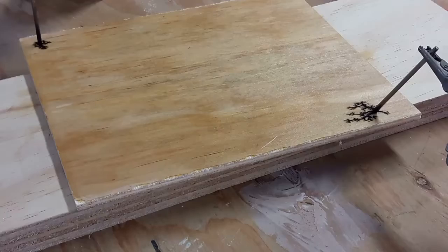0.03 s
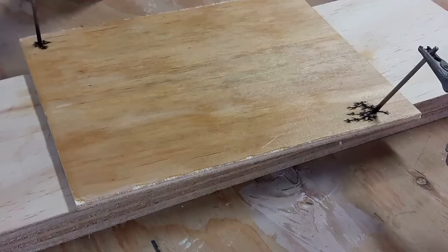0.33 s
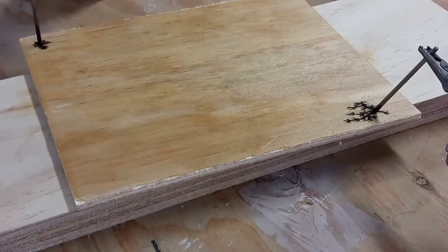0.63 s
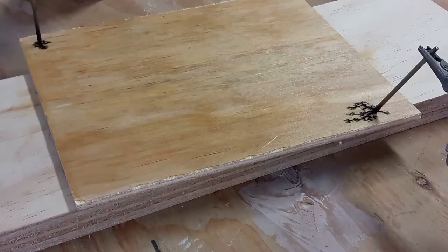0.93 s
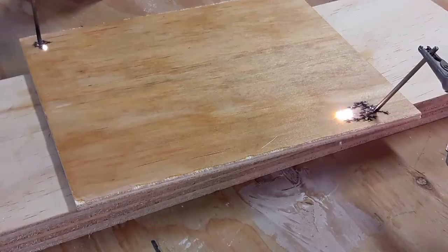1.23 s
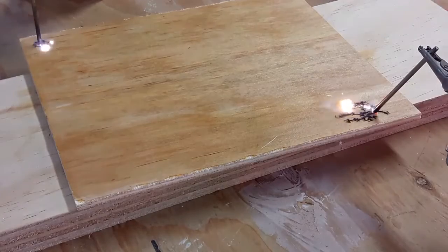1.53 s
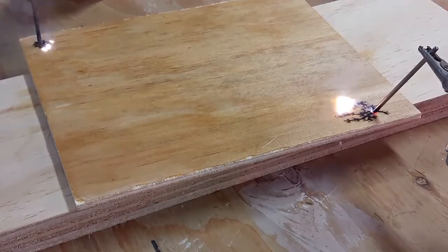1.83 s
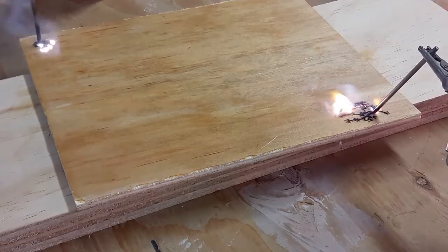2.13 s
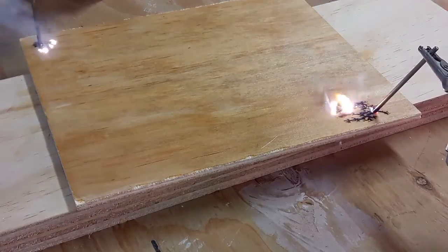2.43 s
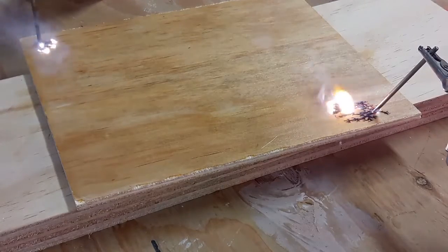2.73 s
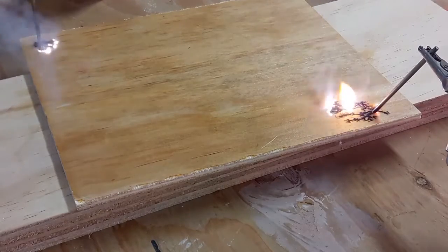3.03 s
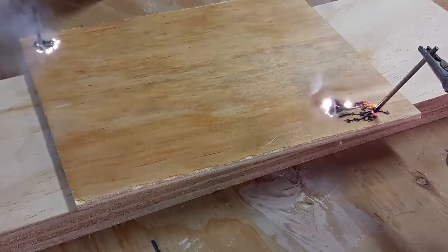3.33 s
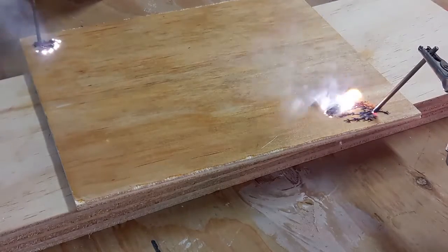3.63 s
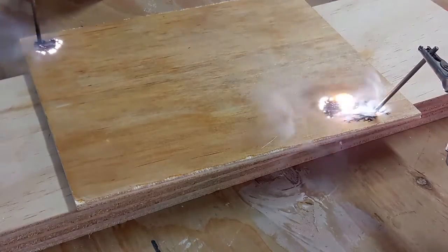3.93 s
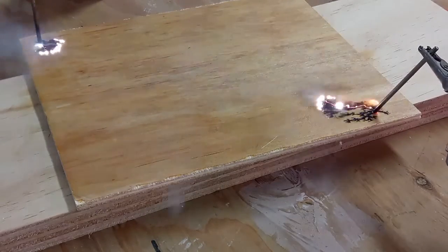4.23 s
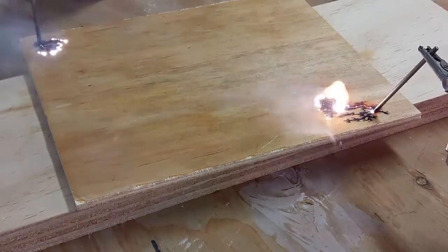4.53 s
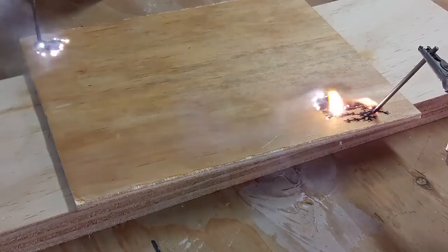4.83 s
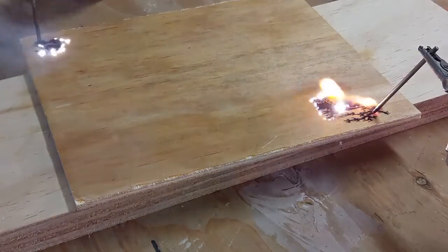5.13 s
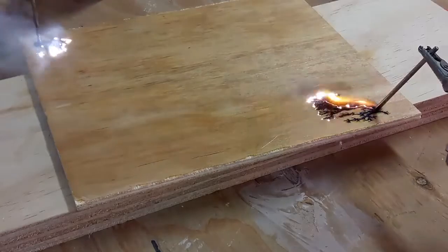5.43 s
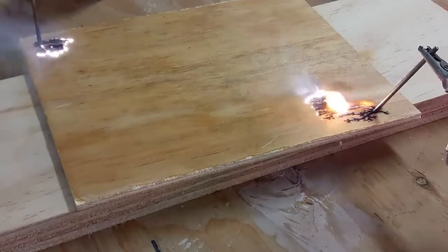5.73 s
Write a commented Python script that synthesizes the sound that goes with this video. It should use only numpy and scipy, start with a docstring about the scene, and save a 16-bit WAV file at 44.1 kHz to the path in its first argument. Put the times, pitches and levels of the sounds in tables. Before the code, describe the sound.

A fan whirs softly at a workshop bench, slightly left of the microphone. After about a second, a switch closes with a sharp, ringing metallic clack and a transformer begins a steady low hum. Electric arcs burn into damp plywood, first spitting quick runs of sparks with small dull pops and a faint flame flutter. Two short spurts of steam follow, and the hum eases under continuing sizzle and scattered snaps.

```python
"""High voltage burning tracks into damp plywood.

At a workshop bench, a fan whirs steadily left of the microphone. A transformer is switched on with a
ringing clack, then hums at twice and four times the mains rate, easing as the load settles. Arcs sizzle
on every voltage peak as they burn branching tracks into the board. A small flame flutters and pops,
sparks spit in runs and steam spurts from the wood."""
import sys
import numpy as np
from scipy import signal
from scipy.fft import rfft, irfft
from scipy.io import wavfile

SR = 44100
rng = np.random.default_rng(int(sys.argv[2]) if len(sys.argv) > 2 else 0)


def master(y):
    """Save y as 16-bit WAV."""
    cut = np.clip(np.atleast_2d(y).T, -1, 1)
    pcm = np.round(cut * 32767)  # scale
    wavfile.write(sys.argv[1], SR, pcm.astype(np.int16))


N = 258867
TIME = np.arange(N) / SR
BINS_HZ = np.arange(N // 2 + 1) * SR / N
MAINS_HZ, SWITCH_S = 59.972, 1.1245


def from_db(db):
    """Decibels to gain."""
    return 10 ** (np.asarray(db) / 20)


def unit_rms(x):
    """Scale to unit power."""
    return x / np.sqrt(np.mean(x ** 2) + 1e-20)


def over_time(points):
    """A curve over time, read at every sample."""
    return np.interp(TIME, *np.transpose(points))


def over_pitch(points):
    """A curve over log frequency, read at every bin."""
    hz, value = np.transpose(points)
    return np.interp(np.log(BINS_HZ + 1), np.log(hz), value)


def pan(left_db):
    """Channel gains that put the left side left_db above the right."""
    return from_db(np.array([[.5], [-.5]]) * left_db)


def pan_by_pitch(x, sides):
    """Pan each frequency by its own amount."""
    return irfft(rfft(x) * pan(over_pitch(sides)), N)


def from_left(x, lag_s):
    """Sound from the left reaches the microphone's right channel a little later."""
    return irfft(rfft(x) * np.exp(-2j * np.pi * BINS_HZ * lag_s * np.array([[0], [1]])), N)


def colour(x, spectrum):
    """Shape a signal's spectrum, then scale to unit power."""
    return unit_rms(irfft(rfft(x) * from_db(over_pitch(spectrum)), N))


def filtered(x, hz, kind):
    """A gentle Butterworth filter."""
    return signal.sosfilt(signal.butter(2, hz, kind, fs=SR, output="sos"), x)


def resonate(x, hz, width_hz):
    """One resonance, with gain 1 at its top."""
    r = np.exp(-np.pi * width_hz / SR)
    feedback = [1, -2 * r * np.cos(2 * np.pi * hz / SR), r * r]
    return signal.lfilter(np.array([1, 0, -1]) * (1 - r * r) / 2, feedback, x)


def drift(rate_hz):
    """Smooth random wander of unit power."""
    return unit_rms(irfft(rfft(rng.standard_normal(N)) / (1 + (BINS_HZ / rate_hz) ** 2), N))


def grains(per_s, spread_db):
    """Random clicks, most of them small, a few large."""
    sizes = from_db(spread_db * np.minimum(rng.exponential(1, N), 5)) * rng.choice([-1, 1], N)
    return sizes * (rng.random(N) < per_s / SR)


def bump(centre_s, half_s):
    """Envelope that swells and fades smoothly."""
    return np.exp(-.5 * np.minimum(((TIME - centre_s) / half_s) ** 2, 100))


def decay(start_s, t60_s, rise_s):
    """Envelope that swells quickly and dies away."""
    age = np.maximum(TIME - start_s, 0)
    return (1 - np.exp(-age / rise_s)) * from_db(-60 * np.minimum(age / t60_s, 4))


def powered(rise_s):
    """Rises from 0 to 1 once the switch is closed."""
    return 1 - np.exp(-np.maximum(TIME - SWITCH_S, 0) / rise_s)


def settled(centre_s=2.72, spread_s=.79):
    """Goes from 0 to 1 as the first flare-up dies down and the load settles."""
    return .5 + .5 * np.tanh((TIME - centre_s) / spread_s)


# How alike the room sounds on the two sides of the microphone: frequency_hz, correlation
ROOM_LIKENESS = [(40, 0.4), (130, 1), (280, 0.38), (610, 0.72), (1310, 0.13), (2800, 0.34), (7000, 0.028)]

def diffuse():
    """White noise from all around: alike in both channels in the bass, unrelated in the treble."""
    mid, side = rfft(rng.standard_normal((2, N)))
    alike = np.clip(over_pitch(ROOM_LIKENESS), -1, 1)
    return unit_rms(irfft(np.sqrt(1 + alike) * mid + np.sqrt(1 - alike) * side * [[1], [-1]], N))


def workshop(x, wet_db, t60_s=.067):
    """Direct sound plus the short, diffuse tail off nearby walls."""
    tail = (diffuse() * decay(.00042, t60_s, .0099))[:, :SR // 2]
    tail = tail / np.sqrt(np.sum(tail ** 2) / 2)
    return x + from_db(wet_db) * signal.fftconvolve(np.atleast_2d(x), tail, axes=1)[:, :N]


# The fan's rush of air: frequency_hz, gain_db
FAN_COLOUR = [(20, -17), (60, -11.5), (100, -13), (125, -3), (200, -4.5), (350, -3.5), (620, -4),
              (1000, -5), (1750, -7), (2500, -10.5), (4000, -18), (6000, -23.5), (7400, -20), (8400, -31.5),
              (10500, -41), (13000, -41)]
# Its hiss lies left of the microphone: frequency_hz, left_over_right_db
FAN_SIDES = [(60, 2.5), (2000, 2), (4000, 2), (7200, 8), (9000, 0)]
# Tones before the switch closes, from the fan's rotor and a faint mains hum at 120 and 360 Hz: pitch_hz,
# level_db
STEADY_PITCHES = [(119.5, -63), (188.4, -67), (250.5, -70), (313.5, -66), (360, -64.5), (438, -66),
                  (564.5, -62), (624.5, -65)]

def fan(air_db=-50, whine_db=-66, sag_db=-3):
    """Air rushes steadily; unsteady tones and a breathy whine soften once the transformer is running."""
    air = from_db(air_db) * pan_by_pitch(colour(diffuse(), FAN_COLOUR), FAN_SIDES)
    tones = sum(from_db(db) * np.sin(2 * np.pi * hz * TIME + .79 * drift(1.6)) for hz, db in STEADY_PITCHES)
    whine = from_db(whine_db) * unit_rms(resonate(diffuse(), hz=627, width_hz=22))
    sag = from_db(sag_db * powered(rise_s=1))
    return air + sag * (np.sqrt(2) * tones + whine) * pan(1.6)


# A thin hiss, far over to the left: frequency_hz, gain_db
HISS_COLOUR = [(1000, -12), (5000, -8), (7300, 1), (8400, -15), (12500, -27)]

def hiss(level_db=-62.5):
    """A faint hiss swells once before the switch closes."""
    swell = from_db(level_db) * bump(centre_s=.81, half_s=.06)
    return swell * colour(diffuse(), HISS_COLOUR) * pan(12)


# The switch's contacts striking, left of the microphone: start_s, relative_db
CONTACT_HITS = [(1.1233, -9), (1.1244, 1), (1.1280, -3), (1.1336, -7), (1.1440, -14)]
# Broad colour of the clack: frequency_hz, gain_db
CLACK_COLOUR = [(70, -37), (120, -41), (175, -5), (350, -19), (520, -5.5), (720, -9), (930, -27),
                (1250, -7.5), (1800, -5), (2400, -9.5), (3100, -6), (3250, -16.5), (7500, -14.5),
                (8200, -24.5), (12500, -41)]
# Resonances of the steel housing: pitch_hz, base_width_hz, relative_db
HOUSING_MODES = [(525, 39, -3), (710, 27, -1.5), (1200, 70, 2), (1410, 110, -4.5), (1840, 100, 2),
                 (2030, 65, -10), (2160, 26, -11), (2270, 20, -7), (2380, 27, -11), (2920, 110, -5),
                 (3100, 60, -7), (3540, 30, -2.5), (3790, 25, -9), (4630, 74, -9), (5250, 66, -6.5),
                 (5620, 24, -7), (5920, 29, -8), (6600, 26, -11), (6660, 15, -11), (6960, 43, -6.5),
                 (7630, 47, -11.5)]
# Its longest-ringing modes: pitch_hz, level_db, t60_s
LONG_MODES = [(296.5, -35, 0.3), (505, -40, 0.21), (711, -31.5, .15), (1250, -29.5, 0.16), (1385, -42, .2),
              (1476, -38, .2), (1502, -38, .2), (1735, -31, 0.28), (1890, -30, 0.18), (2930, -35, .2),
              (3110, -38, 0.39), (5259, -34, 0.14)]

def switch_clack(crack_db=-16, bite_db=-22.5, body_db=19, damping=1.03, thump_db=-32, thump_hz=179):
    """Switching on: a hard crack, the ringing housing and a low thump of inrush, with the room's echoes."""
    # the direct crack is thin; the low notes build up only with the echoes
    hits = sum(from_db(db) * decay(s, .013, .0002) for s, db in CONTACT_HITS)
    thin = filtered(colour(diffuse(), CLACK_COLOUR), [1700, 7000], "band")
    crack = from_db(crack_db) * hits * unit_rms(thin) * pan(6)
    hardest_s = CONTACT_HITS[1][0]
    bright = filtered(colour(diffuse(), CLACK_COLOUR), 4500, "high")
    bite = from_db(bite_db) * decay(hardest_s, .011, .0001) * unit_rms(bright) * pan(5)
    tail = from_db(-25) * decay(SWITCH_S, .28, .0065) * pan(1.9)
    echoes = from_db(1.5) * tail * colour(diffuse(), CLACK_COLOUR)
    # the blow and the rattle after it set the housing ringing
    blow = from_left(signal.unit_impulse(N, round(SWITCH_S * SR)), lag_s=.00037)
    force = from_db(3) * blow * pan(3.7) + tail * diffuse()
    body = sum((-1) ** k * from_db(db + body_db) * resonate(force, hz, width_hz * damping)
               for k, (hz, width_hz, db) in enumerate(HOUSING_MODES))
    ring = 0
    for hz, db, t60_s in LONG_MODES:
        phases = rng.uniform(0, 2 * np.pi, (2, 1))   # each channel hears a mode by its own paths
        ring += from_db(db) * decay(SWITCH_S, t60_s, .0013) * np.sin(2 * np.pi * hz * TIME + phases)
    inrush = from_db(thump_db) * decay(SWITCH_S, .21, .0079)
    thump = inrush * np.sin(2 * np.pi * thump_hz * (TIME - SWITCH_S))
    return bite + crack + echoes + body + ring * pan(1.2) + thump


# The hum's lowest tone, left of centre: time_s, level_db
LOW_HUM_LEVELS = [(1.3, -49), (1.6, -55.5), (1.85, -50.5), (2.08, -61), (2.33, -52), (2.7, -54),
                  (3.35, -48.5), (3.8, -52.5), (4.6, -54.5), (5.4, -51), (5.87, -51)]
# Its overtones, against the tone at four times the mains rate: mains_multiple, relative_db
HUM_OVERTONES = [(6, -29.5), (8, -23.5)]
# The hum falters where strong pops disturb the arc: centre_s, half_length_s, share_lost
HUM_FALTERS = [(2.308, 0.0037, 0.53), (4.187, 0.0048, 0.45)]

def transformer_hum(upper_db=-38.5, settle_db=-5, sway_db=1.14, waver=.14, shimmer_rad=.23):
    """The core flexes twice a mains cycle; the hum eases as the load settles and wavers with the arcs."""
    phase = 2 * np.pi * MAINS_HZ * TIME
    strength = from_db(over_time(LOW_HUM_LEVELS) + sway_db * drift(8)) * (1 + waver * drift(27))
    low = strength * powered(.092) * np.sin(2 * phase + waver * drift(16))
    upper = np.sin(4 * phase)
    for multiple, db in HUM_OVERTONES:
        offset = shimmer_rad * drift(15) + rng.uniform(0, 2 * np.pi)
        upper += from_db(db) * np.sin(multiple * phase + offset)
    upper *= from_db(upper_db + settle_db * settled()) * powered(.035)
    burning = 1 - sum(share * bump(s, half_s) for s, half_s, share in HUM_FALTERS)
    return np.sqrt(2) * burning * (low * pan(4.2) + upper * pan(2.3))


# Arc activity on the board, in front of the microphone: time_s, relative_db
ARC_ACTIVITY = [(1.52, -61.5), (1.86, -58.5), (2.09, -61), (2.8, -60.5), (3.42, -59), (3.75, -61.5),
                (3.95, -64), (4.38, -66.5), (4.5, -62.5), (4.75, -62.5), (5.57, -61.5), (5.87, -60.5)]
# The fizz of boiling wood: frequency_hz, gain_db
SIZZLE_COLOUR = [(80, -35), (400, -5), (1500, -45), (3000, -1), (4600, -3), (6000, -4), (7300, 3),
                 (8300, -2), (9300, -6), (11300, -12.5), (12500, -13)]
# Its top end lies to the right: frequency_hz, left_over_right_db
SIZZLE_SIDES = [(7000, 1), (9000, -3.5)]
# Bright crackle of ticks, sparks and droplets: frequency_hz, gain_db
CRACKLE_COLOUR = [(100, -40), (1200, -14), (4500, -9), (7200, 1), (9300, 0), (10500, -8), (12800, -8)]

def arc_sizzle(gain_db=5, pulse_depth=.15, peak_s=.0048, flicker_db=1.6, tick_db=-6.5):
    """Tiny discharges boil the damp wood, most at each voltage peak; a few stand out as ticks."""
    pulsing = 1 + pulse_depth * np.cos(4 * np.pi * MAINS_HZ * (TIME - peak_s))
    discharges = workshop(grains(per_s=9000, spread_db=2), wet_db=32)
    fizz = colour(discharges, SIZZLE_COLOUR) * from_db(flicker_db * drift(70))
    clumps = grains(per_s=260, spread_db=2.4) * pulsing ** 2 * from_db(2.8 * drift(50))
    ticks = from_db(tick_db) * colour(workshop(clumps, wet_db=-4), CRACKLE_COLOUR)
    activity = from_db(over_time(ARC_ACTIVITY) + gain_db) * powered(.019)
    return activity * pulsing * pan_by_pitch(fizz + ticks, SIZZLE_SIDES)


# A small flame on the board, near the centre: frequency_hz, gain_db
FLAME_COLOUR = [(25, -9), (80, -9), (130, 1), (250, 7), (600, 2), (1100, 2), (2200, -5), (5000, -29)]
# Pockets of gas igniting: start_s, pop_relative_db, pitch_hz, knock_relative_db
GAS_POPS = [(1.496, -29, 800, -52), (1.5872, -24, 850, -43), (1.597, -31, 900, -52), (1.705, -34, 750, -50),
            (1.753, -35, 900, -50), (1.972, -35, 700, -44), (2.306, -32.5, 950, -42),
            (2.3144, -32, 650, -33), (4.1817, -41, 600, -34.5)]

def flame(flare_db=-46.5, fade_db_per_s=6, lumpy_db=2, pop_gain_db=-3, band_ratio=1.99, knock_s=.00063):
    """Wood gas flares with a lumpy flutter that dies down; pockets ignite with a knock and a dull pop."""
    flare = from_db(flare_db - fade_db_per_s * (TIME - SWITCH_S)) * powered(.04) * (1 - settled())
    flutter = flare * from_db(lumpy_db * drift(47)) * colour(diffuse(), FLAME_COLOUR)
    turbulence = rng.standard_normal(N)
    pops = 0
    for s, db, hz, knock_db in GAS_POPS:
        puff = unit_rms(filtered(turbulence, [hz / band_ratio, hz * band_ratio], "band"))
        pops += from_db(db + pop_gain_db) * decay(s, .017, .0012) * puff
        centre_s = s + 2 * knock_s
        knock = (TIME - centre_s) / knock_s * bump(centre_s, knock_s)   # one swing of pressure
        pops += from_db(knock_db) * knock
    return (flutter + workshop(pops, wet_db=-4.5)) * pan(1)


# Runs of sparks as a track advances, just right of centre: start_s, end_s, first_db, last_db
TRACK_RUNS = [(1.275, 1.39, -36, -32.5), (1.405, 1.505, -34, -31), (1.555, 1.705, -43, -47),
              (1.74, 1.89, -42, -33), (1.92, 1.99, -40, -41)]
# Lone snaps, during the runs and after them: start_s, relative_db
LONE_SNAPS = [(1.4128, -35), (1.4965, -33), (1.5963, -40), (1.6292, -35), (1.7466, -35), (1.7978, -35),
              (1.8292, -36), (1.8638, -31), (1.9312, -38), (1.9462, -36), (2.5963, -43), (2.7889, -42),
              (2.996, -35), (3.151, -40), (3.2209, -42), (3.3294, -39), (3.372, -42), (3.5451, -42),
              (3.9344, -44), (4.4128, -47), (4.733, -46), (4.858, -45), (4.9145, -42), (5.15, -43),
              (5.2585, -41), (5.5248, -43), (5.581, -43)]

def sparks(lag_s=.0111, spit_t60_s=.013, snap_t60_s=.0015, crackle_db=3, click_gain_db=6.5):
    """In a run, a spark spits near one voltage peak per mains cycle; a snap is a click with a tiny spit."""
    cycles_s = np.arange(0, N / SR, 1 / MAINS_HZ) + lag_s
    scatter = rng.standard_normal((len(cycles_s), 3)) * (2.5, .0006, .3)   # level_db, delay_s, log_length
    spits = sum(from_db(db) * decay(s, snap_t60_s, .00084) for s, db in LONE_SNAPS)
    for start_s, end_s, first_db, last_db in TRACK_RUNS:
        inside = (cycles_s > start_s) & (cycles_s < end_s)
        for s, (extra_db, late_s, stretch) in zip(cycles_s[inside], scatter[inside]):
            db = np.interp(s, [start_s, end_s], [first_db, last_db]) + extra_db
            spits += from_db(db) * decay(s + late_s, spit_t60_s * np.exp(stretch), .0012)
    crackle = colour(diffuse() * from_db(crackle_db * drift(1700)), CRACKLE_COLOUR)
    strikes = sum(from_db(db) * signal.unit_impulse(N, round(s * SR)) for s, db in LONE_SNAPS)
    clicks = from_db(click_gain_db) * filtered(strikes, 4500, "high")
    return workshop(spits * crackle + clicks, wet_db=-5) * pan(-1.9)


# Spurts from the wood, just left of centre: centre_s, half_length_s, level_db
STEAM_SPURTS = [(2.457, 0.032, -45.5), (3.13, 0.032, -47)]
# The jet's hiss: frequency_hz, gain_db
STEAM_COLOUR = [(80, -35), (500, 5), (1400, 9), (3000, 4), (5000, 1.5), (7300, 6), (8500, -10),
                (12500, -26)]

def steam(sputter_db=2, spatter_db=-7):
    """Trapped moisture escapes in short, sputtering jets that carry droplets."""
    flow = sum(from_db(db) * bump(s, half_s) for s, half_s, db in STEAM_SPURTS)
    droplets = colour(workshop(grains(per_s=600, spread_db=2.5), wet_db=-2), CRACKLE_COLOUR)
    jet = colour(diffuse(), STEAM_COLOUR) * from_db(sputter_db * drift(150))
    return flow * (jet * pan(1.9) + from_db(spatter_db) * droplets)


def scene():
    """The transformer and the bench, heard from one stereo microphone."""
    supply = switch_clack() + transformer_hum()
    bench = arc_sizzle() + sparks() + steam() + flame() + fan() + hiss()
    return supply + from_left(bench, lag_s=.00011)


def record(dry, open_s=.082, notch_hz=8050, notch_q=16, cutoff_hz=12850):
    """The microphone opens just after the start, with a narrow dip in the treble and a steep top cut."""
    opened = dry * np.clip((TIME - open_s) / .0025, 0, 1)
    dipped = signal.lfilter(*signal.iirnotch(notch_hz, notch_q, fs=SR), opened)
    return signal.sosfilt(signal.ellip(10, .3, 80, cutoff_hz, fs=SR, output="sos"), dipped)


dry = scene()
out = record(dry)
master(out)
```